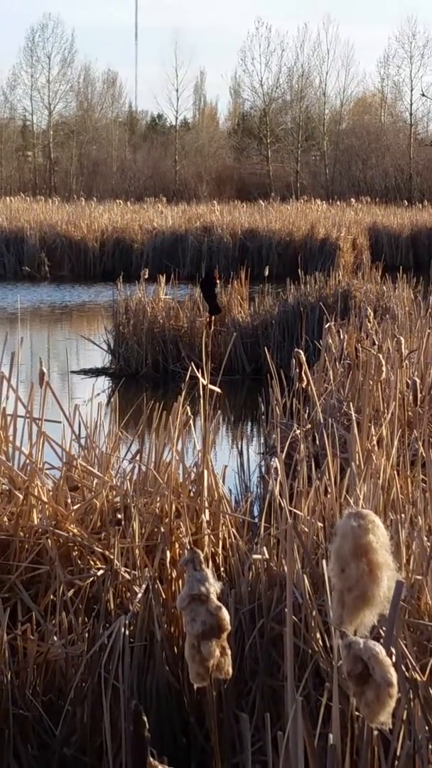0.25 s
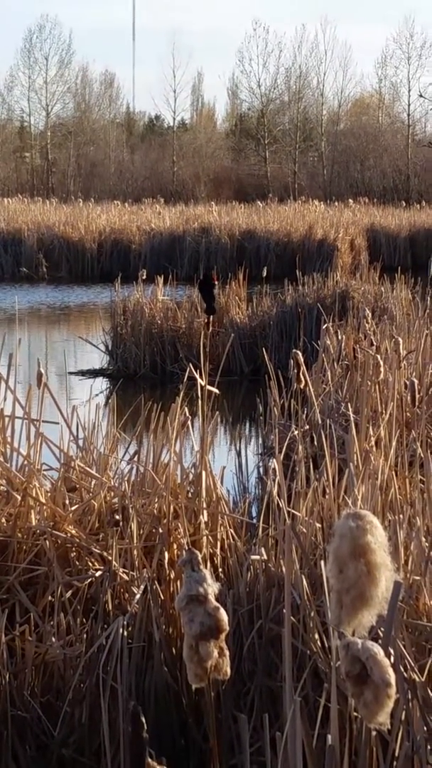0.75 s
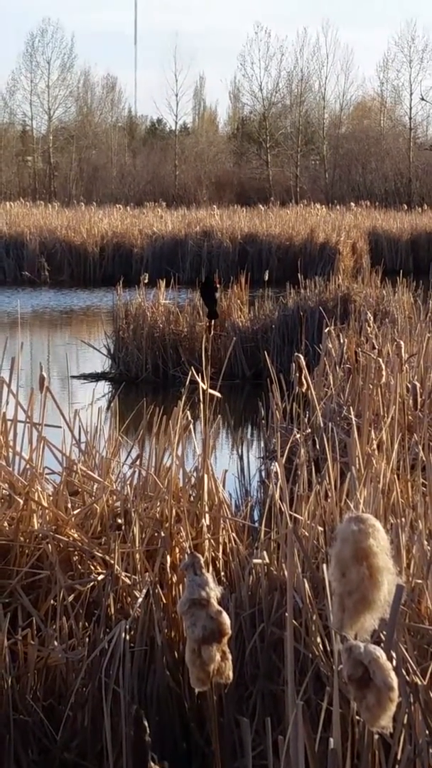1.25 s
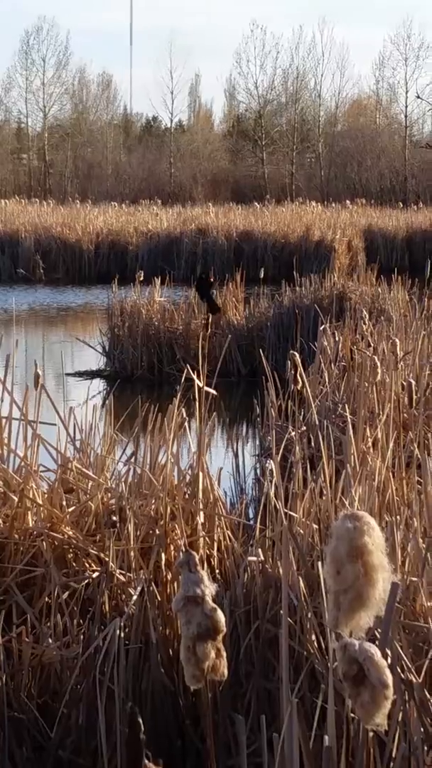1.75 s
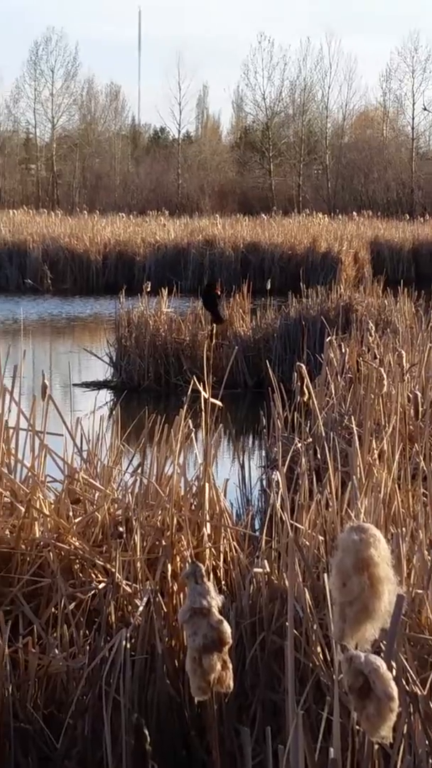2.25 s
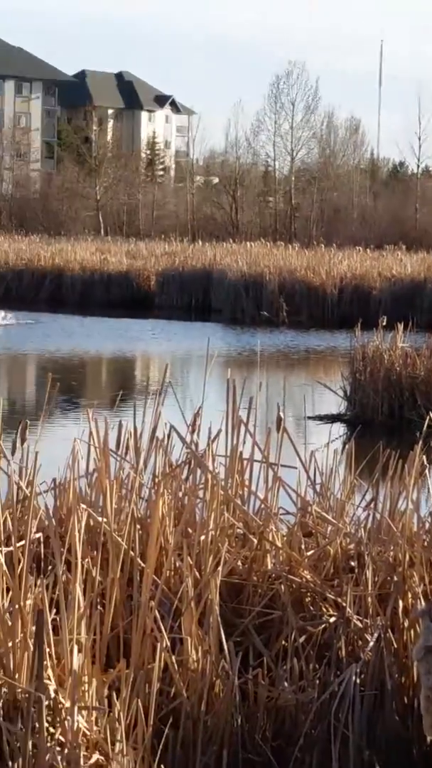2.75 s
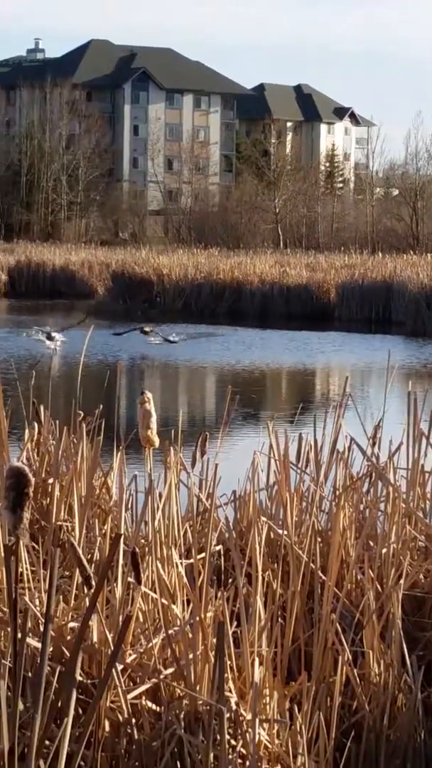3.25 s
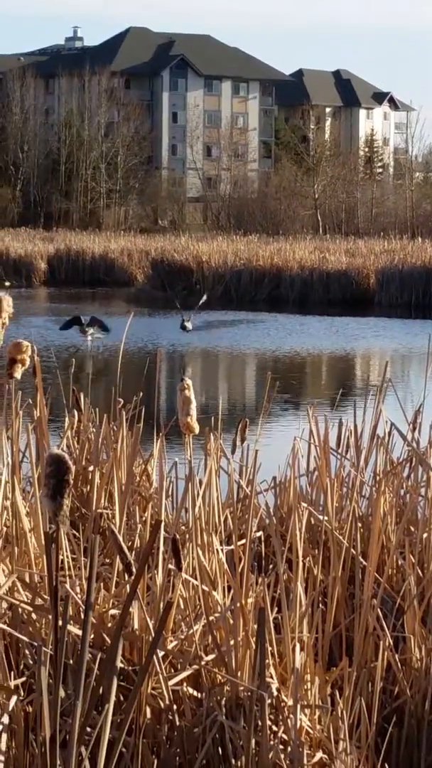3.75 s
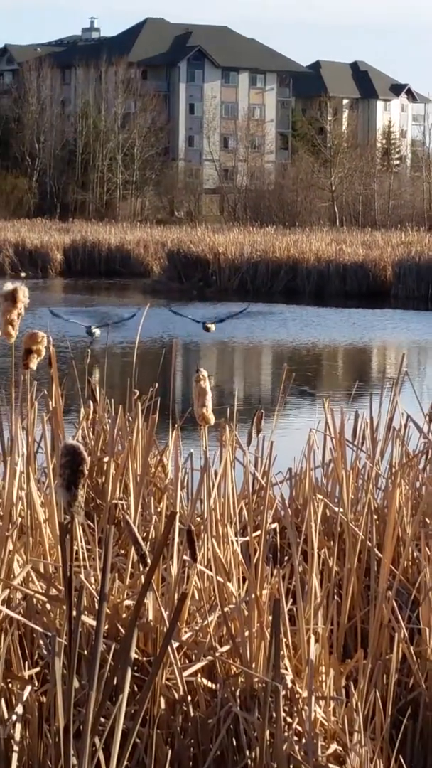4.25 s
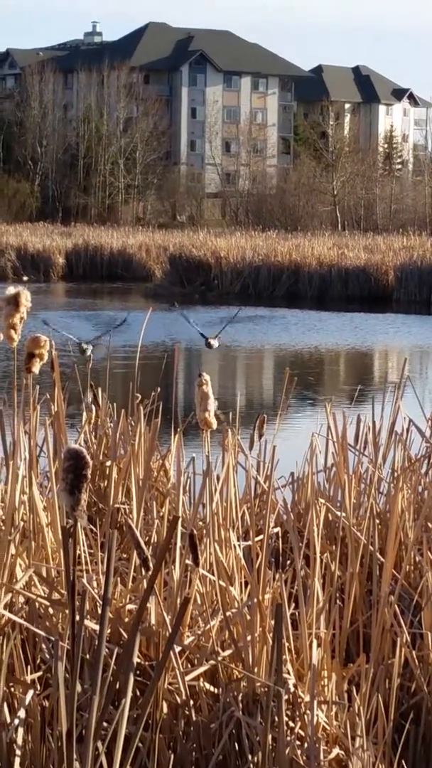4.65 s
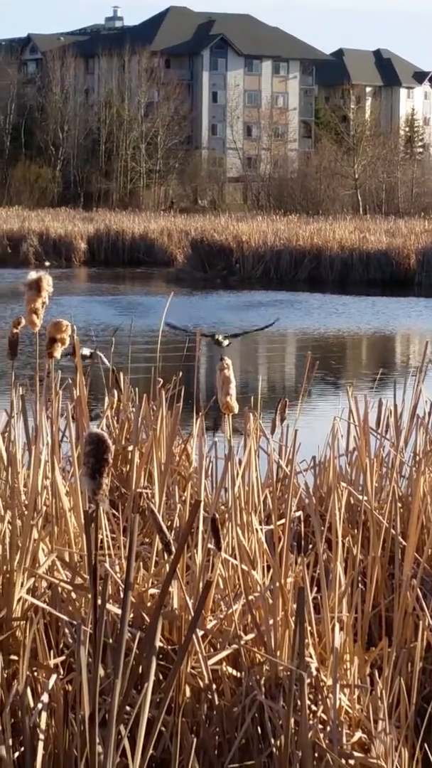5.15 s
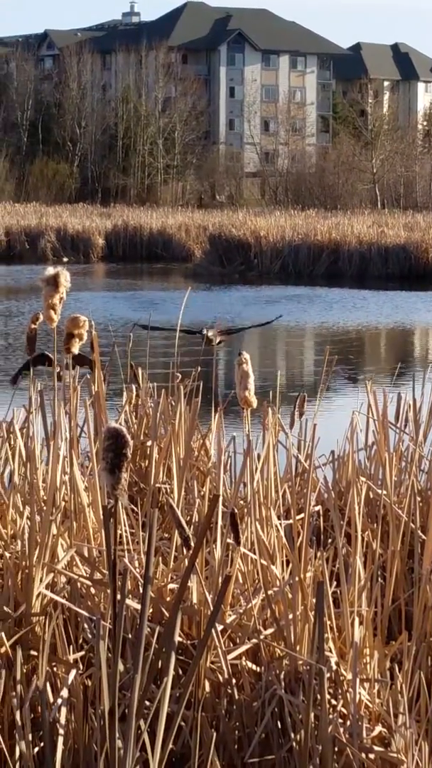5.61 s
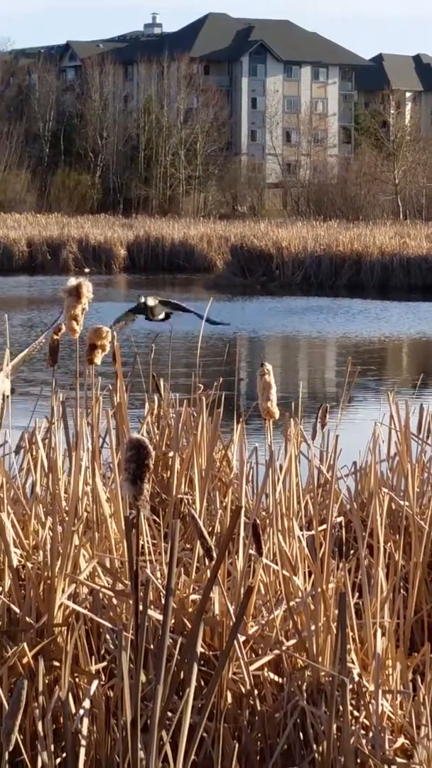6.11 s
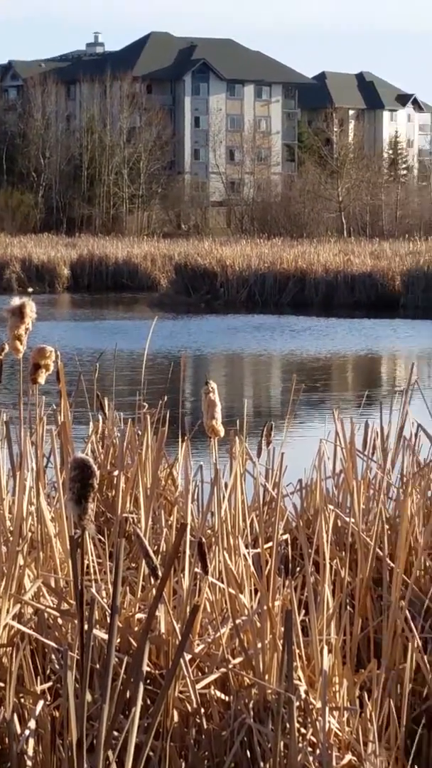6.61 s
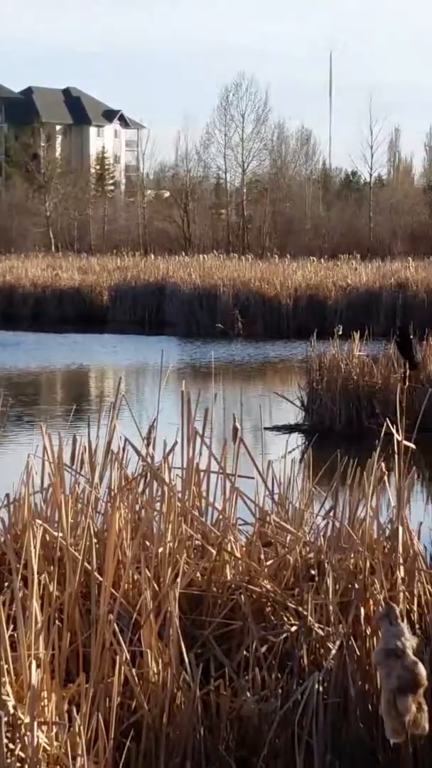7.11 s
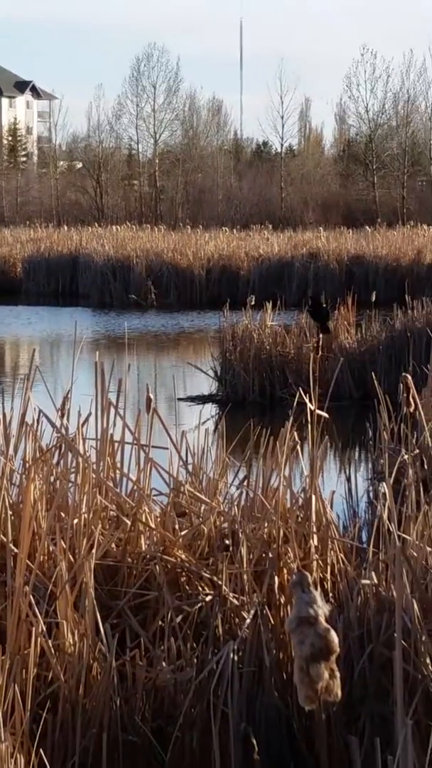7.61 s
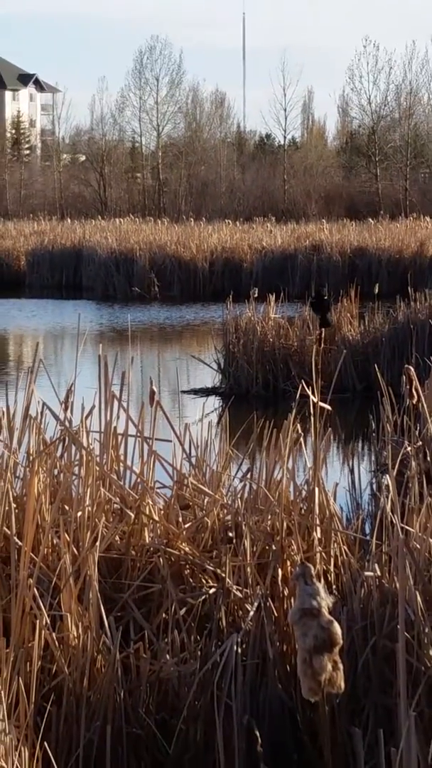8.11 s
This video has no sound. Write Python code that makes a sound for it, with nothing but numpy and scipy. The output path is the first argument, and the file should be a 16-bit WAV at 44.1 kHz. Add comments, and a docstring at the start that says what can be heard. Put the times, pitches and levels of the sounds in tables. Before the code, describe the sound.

A quiet open marsh: low distant traffic rumble and thin airy hiss, with a faint engine hum that slowly gathers speed and level. From 0.15 s a goose gives short, clear, distant honks roughly every 0.4 to 0.5 s, each led in by a tiny rasp and often a quick upward hitch. From 0.5 s a second goose answers between them with gruff, nasal, sagging grunts. Around 1.8 to 2.1 s the honks step up in pitch, and later turn longer and shriller. A dry reed tick snaps at 3.0 s, another pair at 5.3 s. Calls swell from 6 s, closest and loudest at 7.0 to 7.5 s, drier, slightly left, with short dull echoes. The grunts stop after 7.4 s. Low croaky rasps at 7.8 and 8.1 s lead to two clipped, weaker honks near 8.1 and 8.25 s, over the risen rumble.

```python
"""Distant traffic and an engine rumble under a faint hiss, growing louder, as two geese take off from a pond.
One gives clear honks, led in by a rasp and often a low hitch; the other answers with gruff sagging grunts.
They fly past, mostly left of the listener. Each voice is a stack of unsteady harmonics; a thin, dull decaying
noise tail with a few stronger returns makes the echoes, shaped noise the traffic and air, crank harmonics the
engine, short bright bursts the dry ticks in the reeds."""
import sys
import numpy as np
from scipy import signal
from scipy.fft import rfft, irfft
from scipy.io import wavfile

SR = 44100
rng = np.random.default_rng(int(sys.argv[2]) if len(sys.argv) > 2 else 0)


def wav_out(sig):
    """Save sig, one row per channel (or a flat mono array), as 16-bit PCM at SR to the path in sys.argv[1]."""
    wavfile.write(sys.argv[1], SR, np.round(np.clip(np.atleast_2d(sig).T, -1, 1) * 32767).astype(np.int16))


N = 369116
TIME = np.arange(N) / SR

# All levels are relative settings, trimmed further in the functions.
# clear honks: t/s, length/s, f/Hz, push/share of f, level/dB, shrill top/dB, lead-in/s, lead-in level/dB re note
HONKS = [(0.151, 0.079, 665, -0.0057, -52.5, -39, 0.044, -12),
         (.562, 0.068, 663.5, -0.021, -55, -20, 0.032, -9),
         (1.021, 0.083, 668, -0.0068, -56, -18.5, 0.047, -10),
         (1.448, 0.11, 671, -0.0023, -56.5, -28, 0.023, -10),
         (1.771, .119, 732, -0.027, -55, -30.5, .04, -11),
         (2.123, 0.086, 750.4, -0.02, -56.5, -1, .053, -7.5),
         (2.506, 0.11, 753.5, 0.019, -54, -6.5, .058, -8), (2.909, 0.12, 754, 0.02, -53.5, -16, .071, -7.5),
         (3.313, 0.11, 749, 0.014, -52, -20, 0.07, -7.5),
         (3.755, 0.11, 766.6, 0.013, -52.5, -17, 0.068, -7), (4.197, 0.11, 775, 0.015, -50, -5, .064, -9),
         (4.609, .113, 772.4, 0.03, -51.5, 1.5, 0.059, -6.5), (5.038, .153, 770.5, .04, -49, -4, 0.061, -8),
         (5.567, .16, 767, 0.0115, -50, 0.5, .05, -8), (6.057, 0.16, 767.4, 0.044, -46.5, 0, .068, -10),
         (6.584, .16, 771.7, 0.026, -41, 10.5, .061, -6.5),
         (7.041, 0.14, 767, -0.0015, -34.5, -2, 0.05, -12),
         (7.484, 0.14, 749.6, -0.0092, -34.5, -8.5, 0.053, -6.5),
         (8.114, 0.079, 712, 0.0025, -43.5, -68, 0.098, -2.5),
         (8.247, 0.056, 686, 0.025, -43, -63, 0.019, -5.5)]
# grunts of the second goose: t/s, length/s, level/dB, nasal pair of lines/dB
GRUNTS = [(0.512, 0.078, -57, -4), (0.791, 0.046, -54.5, -1.5), (1.089, 0.068, -54.5, -3),
          (1.32, 0.042, -55, -0.5), (1.533, 0.051, -56.5, 0), (1.7, 0.078, -54.5, -3),
          (1.922, 0.049, -49.5, -3.5), (2.12, 0.041, -53.5, -2.5), (2.347, 0.043, -52, -7),
          (2.558, 0.069, -51.5, -6.5), (2.736, 0.056, -61, -1.5), (2.943, 0.062, -52, -4),
          (3.128, 0.049, -53, -5.5), (3.344, 0.074, -50, -5.5), (3.531, 0.066, -49.5, -6.5),
          (3.74, 0.11, -52, -7.5), (3.93, 0.066, -50, -7), (4.138, 0.069, -48, -5.5),
          (4.36, .081, -48, -8.5), (4.619, 0.073, -46.5, -13.5), (4.864, 0.061, -46.5, -11.5),
          (5.117, 0.07, -48.5, -12), (5.349, 0.056, -46.5, -14.5), (5.67, 0.085, -49.5, -7),
          (5.852, 0.0575, -56.5, 7.5), (6.128, 0.078, -44.5, -9.5), (6.363, 0.064, -42.5, -10),
          (6.69, 0.084, -36.5, -10), (6.923, 0.079, -40, -7.5), (7.189, 0.071, -36.5, -11),
          (7.4, 0.08, -34, -12)]
# resonances of the honking throat, and a lift of the top harmonics around 12-14 kHz: f/Hz, level/dB
THROAT = [(760, 3.5), (1540, 5.5), (2300, -4), (3060, -20), (3830, -11), (4600, -13.5), (6130, -23.5),
          (6900, -30), (7660, -38), (9200, -36.5), (10700, -27), (12300, -19), (13800, -19.5),
          (15400, -25.5), (16500, -44)]
# hitches and rasps come through a nearly closed bill: f/Hz, level/dB
CLOSED_BILL = [(250, -48.5), (500, -1.5), (720, 3), (1050, 3), (1380, 2), (1750, -15), (2200, -11.5),
               (3000, -36.5), (4200, -25.5), (5200, -65), (7500, -76), (13000, -82), (16000, -35)]
# the grunt repeats every fourth cycle, so it has lines at quarters of its pitch: multiple of a quarter, level/dB
GRUNT_LINES = [(1, -17), (2, -26.5), (3, 4), (4, 1.5), (5, -16), (6, -8.5), (7, 2.5), (8, 3.5), (9, -53),
               (10, -16), (11, -14), (13, -28.5), (16, -25), (25, -37.5), (36, -55.5)]
# flight past the listener: t/s, lead of the left ear/ms, share of side colouring, left minus right/dB
FLIGHT = [(0, 0, 0.65, 3.5), (4.0, 0.017, 0.54, 3), (6.1, 0, 0.74, 1.5), (6.65, 0.0091, 0.72, 3),
          (7.1, 0.077, 0.54, 3), (7.55, 0.109, 0.15, 0), (8.3, 0.18, 0.093, -2)]
# side colouring of the microphone pair: f/Hz, left minus right/dB
SIDE_COLOUR = [(770, -2.5), (1540, 0), (2300, -4.5), (3100, 20.5), (3850, -15), (5400, -23.5), (6200, -25),
               (7500, 1), (12300, 4.5), (15000, -7)]
# background: t/s, road roar level/dB, air level/dB
BACKGROUND = [(0.0, -55.5, -69), (1.28, -59, -71.5), (1.82, -53.5, -68), (4.41, -54.5, -67),
              (6.13, -53, -62), (8.16, -48.5, -62.5), (8.37, -45.5, -58.5)]
# spectra of the rumble, the road roar, the air and the high hiss: f/Hz, level/dB per Hz
TRAFFIC = [(12, -34.5), (30, 5), (50, 18), (66, 15), (86, 21), (105, 17.5), (135, 11), (165, 5), (260, -52)]
ROAD = [(100, 0.5), (170, -1), (225, 3), (300, -5), (400, -7), (550, -17), (1050, -15), (2000, -66)]
AIR = [(80, -15), (300, 5.5), (600, 7), (1000, 4), (1500, 7.5), (2000, -7), (2900, 1.5), (3900, -3.5),
       (4500, -18.5), (6300, -23), (8000, -44), (11000, -50)]
HISS = [(2000, -45), (5500, -5), (8500, -17.5), (10500, -18), (12000, -4.5), (15000, -5), (17000, -15.5)]
# distant traffic rumble: t/s, level/dB
RUMBLE = [(0.0, -53), (0.63, -49.5), (1.19, -56), (1.82, -43), (2.19, -50.5), (3.85, -49), (3.87, -51),
          (4.01, -46.5), (4.64, -42.5), (7.6, -40), (8.37, -37)]
# high hiss: t/s, level/dB
HISS_LEVEL = [(0.0, -85.5), (0.47, -87.5), (6.62, -75), (6.71, -69), (8.37, -78)]
# a distant engine slowly gathers speed: t/s, crank f/Hz, level/dB
ENGINE = [(0, 24.97, -59), (2.7, 26.27, -55.5), (4.2, 26.33, -50.5), (5.3, 26.4, -46), (6.5, 26.92, -45),
          (7.5, 27.45, -44), (8.37, 28.33, -39)]
# its hum: multiple of the crank rate, level/dB
ENGINE_LINES = [(2, 3.5), (3, -1.5), (3.6, 1.5), (5, -1), (8, -10), (9, -11.5), (13, -19), (14, -18.5),
                (15, -18)]
# dry ticks in the reeds: t/s, level/dB
TICKS = [(3.0237, -45.5), (5.3251, -43), (5.3414, -54)]
# echoes from the water's edge and the far bank: delay/s, level/dB
ECHOES = [(.052, -36.5), (.135, -19), (.21, -22.5)]
# share of a honk's push in force at its start and after 1/4, 1/2 and 3/4 of it
PUSH_LEFT = [0.97, 0.345, -0.54, 0.21]
# how far a shrill call lifts each range: f/Hz, share of the shrill top
SHRILL_REACH = [(760, 0), (2300, 0.08), (3800, 0.33), (6300, 0.3), (10000, 0.84)]
# the bite that every honk has: f/Hz, level/dB
BITE = [(760, 0), (1540, 0.37), (2300, 0.35), (3800, 0.5), (4600, 2), (6300, 1.5), (10000, 0.7)]
# rasps on their own, as the geese fly off: t/s, length/s, f/Hz, level/dB, chesty low line/dB
CROAKS = [(7.801, 0.069, 264.7, -47.5, 2), (8.101, .06, 255, -45.5, 4.5), (8.174, 0.077, 250.2, -44, 10)]
# grunt pitch rises with the effort of taking off: t/s, f/Hz
GRUNT_PITCH = [(.5, 686.4), (1.55, 696.4), (2.35, 795), (3.1, 802), (3.7, 820), (4.7, 833.5), (6.3, 838),
               (7.4, 816.4)]
# the water mirrors the honks, later and later as the goose climbs: t/s, delay/ms
MIRROR = [(0, 0.029), (2.2, 0.04), (3.35, 0.067), (3.8, 0.081), (4.25, 0.13), (4.66, 0.14), (5.11, 0.18),
          (5.64, 0.25), (6.13, 0.598), (6.66, 0.81), (7.11, 0.925), (7.55, 1.045)]

MIRROR_SHARE = 0.49  # strength of the reflection re the direct sound
END_FALL = .19  # share of its pitch by which a honk falls at the end
# pitch unsteadiness of a honk (share of the pitch): while it holds, then added before it locks in and as it runs out
HELD_JITTER, UNLOCKED_JITTER, SLACK_JITTER = 0.005, 0.025, 0.055
# a long lead-in opens with a hitch, which slides up from the same low note every time and fills its first part
HITCH_NEEDS_S = .048
HITCH_HZ, HITCH_RISE_HZ_PER_S, HITCH_SHARE, HITCH_OVER_RASP_DB = 645, 3990, 0.613, 4.5
# the rasp sits near a third of the note's pitch and runs on into the note; the lower, the chestier
RASP_SHARE, RASP_OVERLAP_S, RASP_PITCH_SHARE = .58, 0.022, .343
CHEST_DB, CHEST_AT_HZ, CHEST_DB_PER_HZ = 4, 255, 0.186
# the higher a grunt starts, the further it sags
SAG_FROM_HZ, SAG_PER_HZ = 563, 0.000326
# the overtone below the grunted note grows more slowly than the note itself
LOW_DB, LOW_AT_DB, LOW_LAG = -8, -52, 0.33
CUTOFF_HZ = 15900


def from_db(db):
    """Decibels to gain."""
    return 10 ** (np.asarray(db) / 20)


def rms_one(x):
    """Scale to unit rms."""
    return x / np.sqrt(np.mean(x ** 2) + 1e-20)


def in_time(rows, t):
    """The columns of a curve at the times t."""
    s, *columns = np.transpose(rows)
    return [np.interp(t, s, c) for c in columns]


def at_hz(points, hz):
    """Read a spectrum on a log-frequency axis."""
    freq, value = np.transpose(points)
    return np.interp(np.log(np.maximum(hz, 1)), np.log(freq), value)


def waver(t, rate, count=1):
    """Rows of smooth random motion of spread 1, changing about rate times a second."""
    knots = rng.standard_normal((count, 256))
    place = (t - t[0]) * rate
    i = place.astype(int)
    blend = np.sin(np.pi / 2 * (place % 1)) ** 2
    here = knots.take(i, axis=1, mode="wrap")
    following = knots.take(i + 1, axis=1, mode="wrap")
    return rms_one(here * (1 - blend) + following * blend)


def span(start, end):
    """Sample times of a call, and its progress from 0 to 1."""
    t = np.arange(int(start * SR), int(end * SR)) / SR
    return t, np.linspace(0, 1, len(t))


def swell(t, attack_s, release_s):
    """A rounded rise and fall."""
    rise = np.sin(np.pi / 2 * np.clip((t - t[0]) / attack_s, 0, 1))
    fall = np.sin(np.pi / 2 * np.clip((t[-1] - t) / release_s, 0, 1)) ** 2
    return rise * fall


def add(out, t, sound):
    """Mix a stereo sound in at its time."""
    first = round(t[0] * SR)
    out[:, first:first + len(t)] += sound[:, :max(N - first, 0)]


def voice(t, pitch, lines_db, jitter, jitter_hz, shimmer_db):
    """Harmonics of an unsteady syrinx as they reach the two microphones; lines_db has one row per harmonic."""
    order = np.arange(1, len(lines_db) + 1)[:, None]
    hz = order * pitch
    phase = 2 * np.pi * order * np.cumsum(pitch * (1 + jitter * waver(t, jitter_hz)[0])) / SR
    lead_ms, sideways, balance_db = in_time(FLIGHT, t.mean())
    colour_db = (balance_db + sideways * at_hz(SIDE_COLOUR, hz)) / 2
    # reflections off water and reeds make the higher harmonics fade in and out, each on its own
    fading_db = 4.4 * np.clip(hz / 6000, 0, 1) * waver(t, 35.5, count=len(order))
    # fast flutter roughens the upper harmonics most
    flutter_db = shimmer_db * (1 + np.clip(hz / 4000, 0, 1.5)) * waver(t, jitter_hz, count=len(order))
    height = np.sqrt(2) * from_db(lines_db + fading_db + flutter_db) * (hz < SR / 2)
    # half the phase lead goes to each ear, with a wander that widens the upper harmonics
    turn = np.pi * hz * lead_ms / 1000
    turn = turn + 0.64 * np.clip(hz / 2500, 0, 1) * waver(t, 25.5, count=len(order))
    ears = [(height * from_db(side * colour_db) * np.sin(phase + side * turn)).sum(axis=0) for side in (1, -1)]
    return np.array(ears)


def coloured_noise(spectrum, likeness):
    """Stereo noise of unit rms with the given spectrum and left-right likeness."""
    gain = from_db(at_hz(spectrum, np.arange(N // 2 + 1) * SR / N))
    mid, side = irfft(rfft(rng.standard_normal((2, N))) * gain, N)
    return rms_one(np.sqrt(1 + likeness) * mid + np.sqrt(1 - likeness) * side * [[1], [-1]])


def background():
    """Far traffic swells slowly under the hiss of the open air: shaped noise, plus the engine."""
    rumble_db, = in_time(RUMBLE, TIME)
    road_db, air_db = in_time(BACKGROUND, TIME)
    hiss_db, = in_time(HISS_LEVEL, TIME)
    rumble = from_db(rumble_db - 5) * coloured_noise(TRAFFIC, likeness=0.97)
    road = from_db(road_db + 3.0) * coloured_noise(ROAD, likeness=0.91)
    air = from_db(air_db + 9.5) * coloured_noise(AIR, likeness=0.13)
    hiss = from_db(hiss_db + 5) * coloured_noise(HISS, likeness=0.12)
    lean_right = from_db([[-.4], [.4]])
    return (rumble + road + engine()) * lean_right + air + hiss


def engine():
    """A far engine hums, each line wandering and fading on its way across the marsh."""
    crank_hz, level_db = in_time(ENGINE, TIME)
    turns = np.cumsum(crank_hz * (1 + 0.00373 * waver(TIME, 6)[0])) / SR
    hum = 0
    for multiple, line_db in ENGINE_LINES:
        strength = from_db(line_db + 3 * waver(TIME, 7))
        hum = hum + strength * np.sin(2 * np.pi * multiple * turns + 1.1 * waver(TIME, 11))
    return from_db(level_db - 2) * hum


def rasps():
    """Uneven slow pulses on an arching pitch: the low overtones stay lines, the rest smear into a rattle."""
    out, order = np.zeros((2, N)), np.arange(1, 56)[:, None]
    lead_ins = []
    for start, _, honk_hz, _, honk_db, _, lead_s, lead_db in HONKS:
        ahead_s, rasp_hz = RASP_SHARE * lead_s, RASP_PITCH_SHARE * honk_hz
        chest_db = CHEST_DB + CHEST_DB_PER_HZ * (CHEST_AT_HZ - rasp_hz)
        lead_ins.append((start - ahead_s, ahead_s + RASP_OVERLAP_S, rasp_hz, honk_db + lead_db, chest_db))
    for start, length, pitch_hz, level_db, chest_db in lead_ins + CROAKS:
        t, u = span(start - .005, start + length + 0.0072)  # room for the fades
        arch = np.sin(np.pi * u)
        pitch = pitch_hz * (.98 + 0.0393 * arch - 0.025 * u)
        bill_db = at_hz(CLOSED_BILL, order * pitch_hz) + chest_db * (order == 2)
        opening_db = np.log2(order) * 0.31 * (arch - 1)  # brightest in the middle
        note = voice(t, pitch, level_db + bill_db + opening_db, jitter=.045, jitter_hz=330, shimmer_db=3.5)
        add(out, t, note * swell(t, attack_s=0.022, release_s=0.024))
    return out


def mirrored_db(t, hz):
    """The reflection off the pond cancels some harmonics and strengthens others."""
    delay_ms, = in_time(MIRROR, t.mean())
    depth = 2 * MIRROR_SHARE / (1 + MIRROR_SHARE ** 2)
    return 10 * np.log10(1 + depth * np.cos(2 * np.pi * hz * delay_ms / 1000))


def honks():
    """A ringing note bends about its pitch by its push, then drops and dulls as the pressure runs out."""
    out, order = np.zeros((2, N)), np.arange(1, 24)[:, None]
    for start, length, pitch_hz, push, level_db, top_db, _, _ in HONKS:
        t, u = span(start, start + length)
        slack = np.clip((u - .7) / .3, 0, 1) ** 2
        bend = 1 + push * np.interp(u, np.arange(4) / 4, PUSH_LEFT)
        pitch = pitch_hz * bend * (1 - END_FALL * slack)
        hz = order * pitch
        bill_db = at_hz(BITE, hz) + top_db * at_hz(SHRILL_REACH, hz) + mirrored_db(t, hz)
        # the note is rough and dull until it has locked in
        unlocked = np.exp(-(t - start) / 0.0078)
        dulling_db = np.log2(order) * (1.9 - 2.7 * u - 5.0 * slack - 4.6 * unlocked)
        jitter = HELD_JITTER + UNLOCKED_JITTER * unlocked + SLACK_JITTER * slack
        lines_db = level_db + at_hz(THROAT, hz) + bill_db + dulling_db
        note = voice(t, pitch, lines_db, jitter, jitter_hz=595.4, shimmer_db=0.66)
        add(out, t, note * swell(t, attack_s=0.0033, release_s=0.0079) * from_db(-5 * slack))
    return out


def marsh(calls, tail_db, t60, dull_hz):
    """Reeds and trees scatter a thin, dull tail with a few stronger returns."""
    t = np.arange(SR) / SR
    density = from_db(tail_db - 60 * t / t60) * np.sqrt(2 * np.log(1000) / (t60 * SR)) * (t > .008)
    smear_s = 0.0057
    for delay, echo_db in ECHOES:
        density = density + from_db(echo_db) * np.exp(-np.abs(t - delay) / smear_s) / np.sqrt(smear_s * SR)
    # one scatter shared by both ears, plus a weaker one for each
    scatter = (rng.standard_normal(SR) + .5 * rng.standard_normal((2, SR))) * density
    scatter = signal.sosfilt(signal.butter(2, dull_hz, fs=SR, output="sos"), scatter)
    return signal.fftconvolve(calls, scatter, axes=1)[:, :N]


def grunts():
    """A gruff, nasal note that starts hoarse and sags all along, its cycles grouped in fours."""
    out, order = np.zeros((2, N)), np.arange(1, 41)[:, None]
    for start, length, level_db, nasal_db in GRUNTS:
        pitch_hz, = in_time(GRUNT_PITCH, start)
        sag = SAG_PER_HZ * (pitch_hz - SAG_FROM_HZ)
        low_db = LOW_DB - LOW_LAG * (level_db - LOW_AT_DB)
        t, _ = span(start - .015, start + length + .01)  # room for the fades
        u = np.maximum((t - start) / length, 0)
        quarter_pitch = pitch_hz / 4 * (1 - sag * u ** 2)
        hoarse = np.clip((start + .007 - t) / .008, 0, 1)
        nasal = np.interp(order, [4, 7, 8, 11], [0, 1, 1, .5])
        colour_db = low_db * (order == 3) + nasal_db * nasal
        lines_db = level_db + at_hz(GRUNT_LINES, order) + colour_db + 1.5 - 11 * hoarse - 4 * u ** 2
        note = voice(t, quarter_pitch, lines_db, jitter=.007 + .06 * hoarse, jitter_hz=307, shimmer_db=1.66)
        add(out, t, note * swell(t, attack_s=.012, release_s=.026))
    return out


def hitches():
    """Before a honk with a long lead-in, a short note slides up as the pressure builds."""
    out, order = np.zeros((2, N)), np.arange(1, 12)[:, None]
    for start, _, _, _, honk_db, _, lead_s, lead_db in HONKS:
        if lead_s < HITCH_NEEDS_S:
            continue
        length, level_db = HITCH_SHARE * lead_s, honk_db + lead_db + HITCH_OVER_RASP_DB
        t, u = span(start - lead_s, start - lead_s + length)
        pitch = HITCH_HZ + HITCH_RISE_HZ_PER_S * length * u ** 1.69
        colour_db = at_hz(CLOSED_BILL, order * pitch) + mirrored_db(t, order * pitch)
        lines_db = level_db + 3 - 5 * u + colour_db
        note = voice(t, pitch, lines_db, jitter=.02, jitter_hz=400, shimmer_db=1.5)
        add(out, t, note * swell(t, attack_s=0.0031, release_s=0.0095))
    return out


def ticks():
    """A dry stalk snaps: a very short bright burst of band-passed noise."""
    out = np.zeros((2, N))
    band = signal.butter(2, [3300, 5500], "band", fs=SR, output="sos")
    for start, level_db in TICKS:
        t, _ = span(start, start + 0.042)
        burst = rng.standard_normal((2, len(t))) * np.exp(-(t - start) / 0.0025)
        add(out, t, from_db(level_db + 6.5) * signal.sosfilt(band, burst))
    return out


def scene():
    """Both geese over the marsh; the nearer they come, the drier they sound."""
    calls = rasps() + honks() + grunts() + hitches()
    wet_db = np.interp(TIME, [0, 5.5, 7.0], [1.5, 0, -6])
    echoes = marsh(calls * from_db(wet_db), tail_db=-11.5, t60=0.36, dull_hz=2720)
    return background() + calls + echoes + ticks()


def record(dry):
    """The top is cut steeply."""
    return signal.sosfilt(signal.ellip(10, .1, 80, CUTOFF_HZ, fs=SR, output="sos"), dry)


dry = scene()
out = record(dry)
wav_out(out)
```